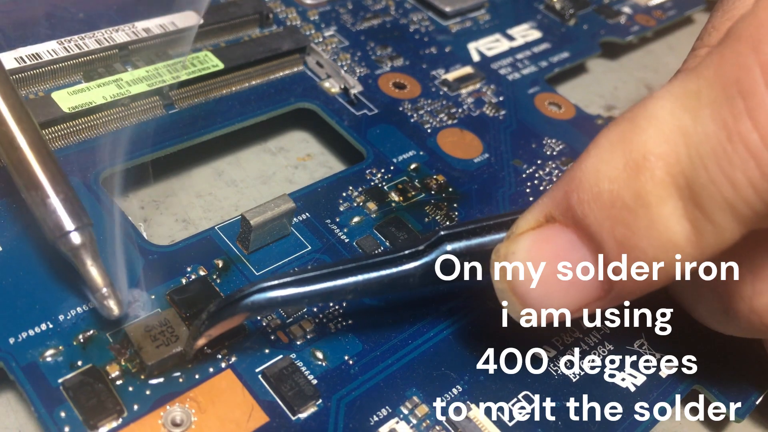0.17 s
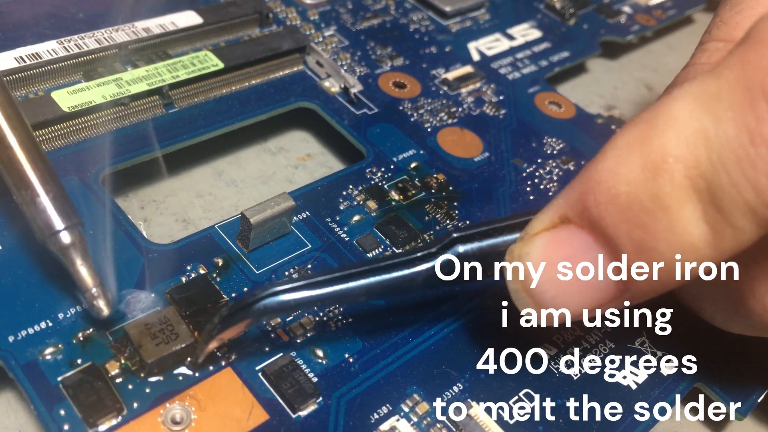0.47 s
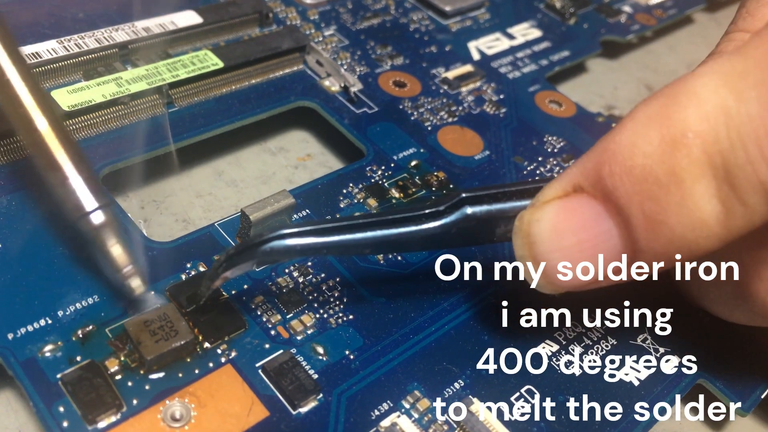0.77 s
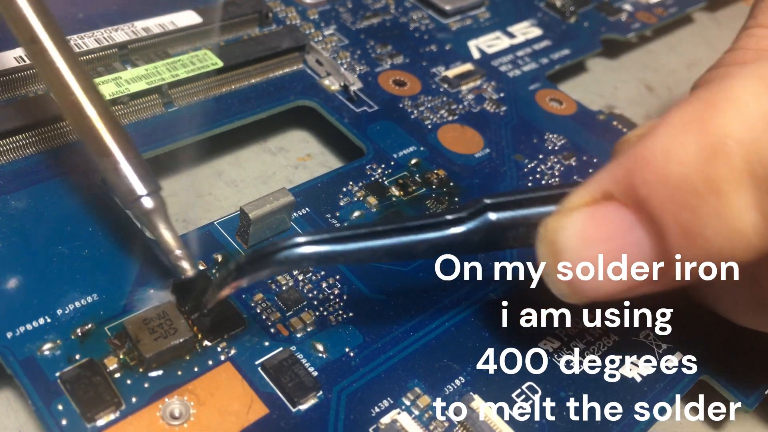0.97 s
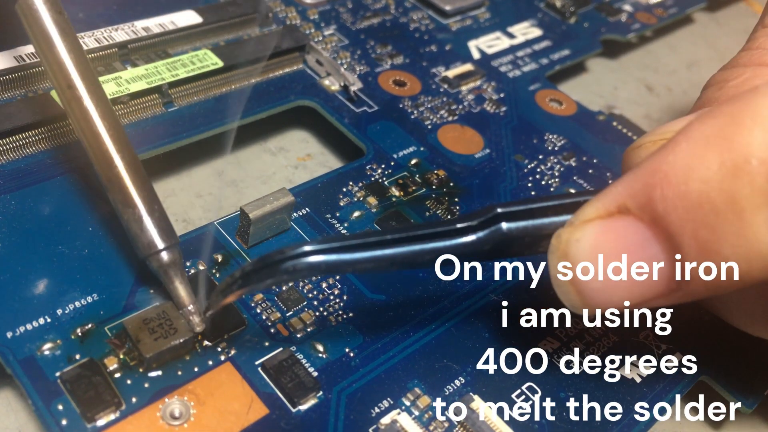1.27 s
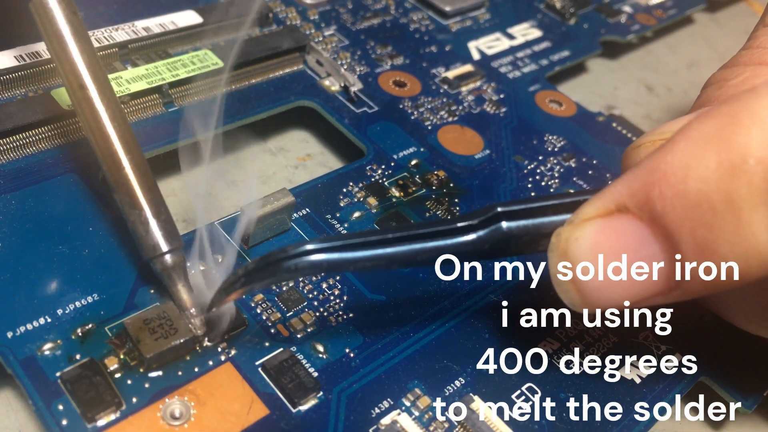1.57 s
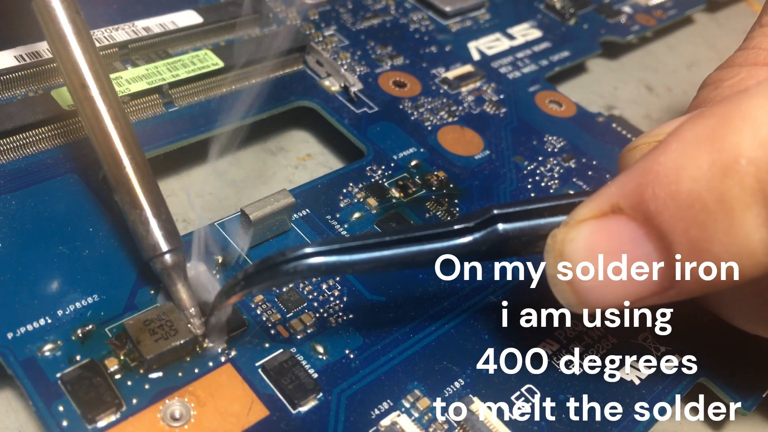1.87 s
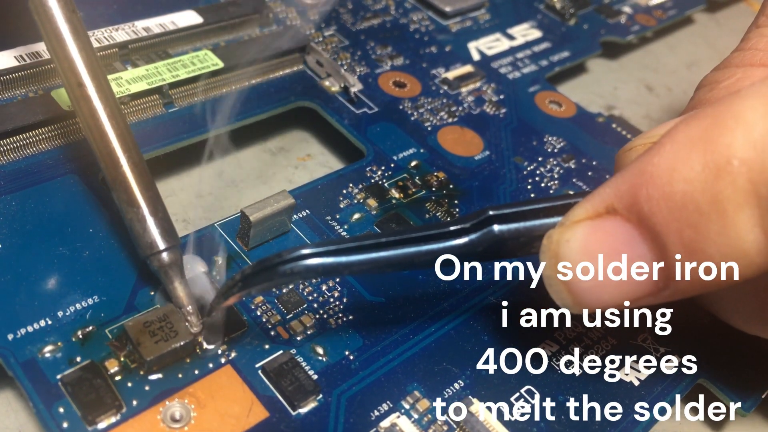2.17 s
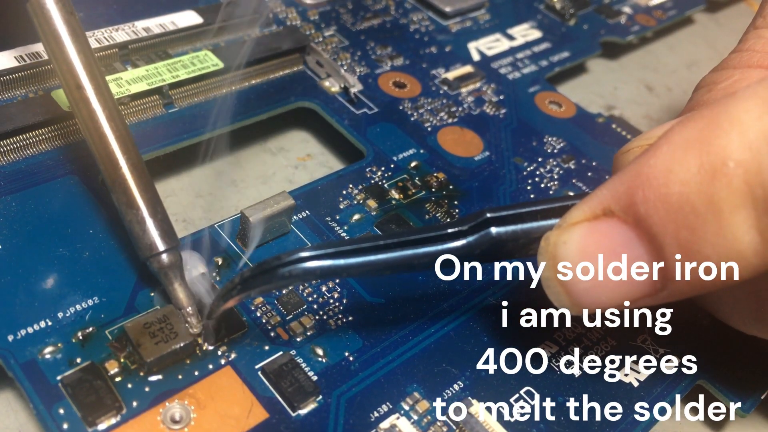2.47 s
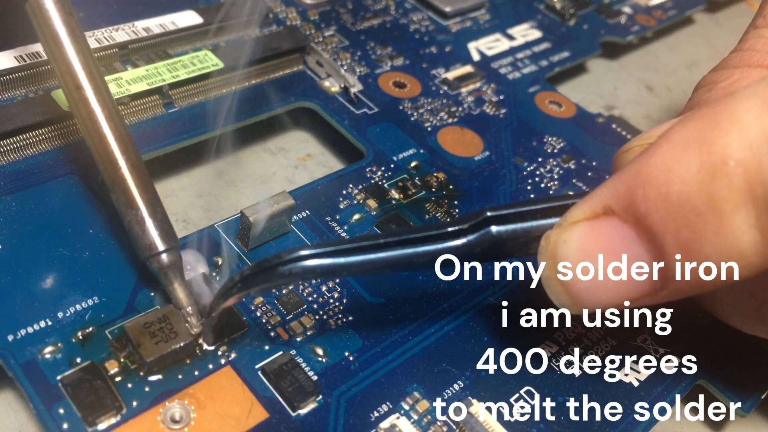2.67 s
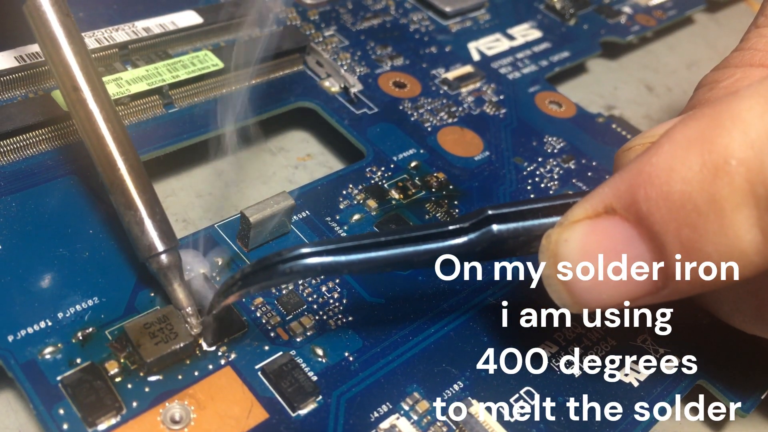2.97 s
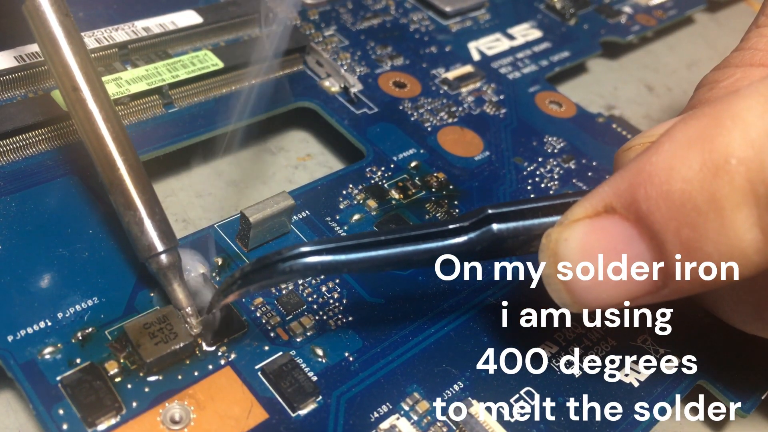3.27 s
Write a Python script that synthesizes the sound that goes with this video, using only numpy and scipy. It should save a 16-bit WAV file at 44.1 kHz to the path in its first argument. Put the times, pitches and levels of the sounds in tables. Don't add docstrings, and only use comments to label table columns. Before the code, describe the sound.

A soldering iron makes flux sizzle on a circuit board: quiet fan rumble and a few small clicks first, then knocks and a sharp hiss fading into fine crackling, close microphone at a workbench.

```python
import sys
import numpy as np
from scipy import signal
from scipy.fft import rfft, irfft, next_fast_len
from scipy.io import wavfile
from scipy.ndimage import uniform_filter1d, map_coordinates

SR = 44100
rng = np.random.default_rng(int(sys.argv[2]) if len(sys.argv) > 2 else 0)


def output_pcm(signal):
    pcm = np.clip(np.atleast_2d(signal).T, -1, 1) * 32767
    wavfile.write(sys.argv[1], SR, np.round(pcm).astype(np.int16))


def level_to_linear(level):
    exponent = np.asarray(level, float) / 20
    return 10 ** exponent


N = 150381
SHAFT_HZ = 63.64
IN_STEP_S = .007
TOP_HZ = 15750


def unit(x):
    return x / np.sqrt(np.mean(x ** 2) + 1e-20)


def along(points, hz):
    f, v = np.transpose(points)
    return level_to_linear(np.interp(np.log(hz + 1), np.log(f + 1), v, left=-120, right=-120))


def along_held(points, hz):
    return along(points, np.minimum(hz, points[-1][0]))


def bumps(rows, hz):
    return sum(db * np.exp(-((hz - centre) / width) ** 2) for centre, width, db in rows)


def wobble(rate):
    knots = rng.standard_normal(int(N * rate / SR) + 4)
    return map_coordinates(knots, [np.arange(N) * rate / SR])


def filtered(x, response):
    m = next_fast_len(N + 8192)
    return irfft(rfft(x, m) * response(np.fft.rfftfreq(m, 1 / SR)), m)[:N]


def patchy(patchy_db):
    z = signal.stft(rng.standard_normal(N), nperseg=256)[2]
    field = uniform_filter1d(rng.standard_normal(z.shape), size=8, axis=0)
    field = uniform_filter1d(field, size=6, axis=1)
    return signal.istft(z * level_to_linear(patchy_db * unit(field)), nperseg=256)[1][:N]


def add(out, s, sound):
    out[round(s * SR):][:len(sound)] += sound


# (multiple of the shaft rate [1], level [dB])
SHAFT_ORDERS = [(1, -51), (2, -49), (3, -59), (4, -60)]
# (frequency [Hz], level [dB])
STEADY_HUMS = [(46.92, -71), (58.28, -55), (102.64, -66), (120.01, -56), (140.76, -63), (205.3, -64),
               (443.55, -65), (2098.6, -82), (4589.1, -89), (5824.6, -94), (6057.6, -92), (9174.5, -90)]


def hum():
    since_step = np.arange(N) / SR - IN_STEP_S
    tones = [(k * SHAFT_HZ, db) for k, db in SHAFT_ORDERS] + list(STEADY_HUMS)
    out = np.zeros(N)
    for hz, db in tones:
        level = np.sqrt(2) * level_to_linear(db + 1 * wobble(3.14))
        out += level * np.sin(2 * np.pi * hz * since_step + .12 * wobble(4.27))
    return out


def bearing():
    turns = np.zeros(N)
    at = np.arange(int(N / SR * SHAFT_HZ)) * SR / SHAFT_HZ + (IN_STEP_S - .002) * SR
    at = at.astype(int)
    turns[at] = level_to_linear(-77 + 2.5 * rng.standard_normal(len(at)))
    t = np.arange(1500) / SR
    ring_hz, t60 = 9930, .014
    tick = level_to_linear(-60 * t / t60) * (1 - np.exp(-t / 0.00039)) * np.sin(2 * np.pi * ring_hz * t)
    return 2 * signal.fftconvolve(turns, tick)[:N]


# (frequency [Hz], density [dB per Hz])
LOW_RUSH = [(25, -41), (50, -10), (90, -11.5), (135, -0.5), (165, -5), (255, 0.5), (350, -4), (480, -21)]
# (frequency [Hz], density [dB per Hz])
HIGH_RUSH = [(240, -48), (400, -5), (684, -5.5), (738, -12.5), (1400, -17.5), (1490, -16), (3020, -27.5),
             (9530, -42.5), (15600, -55)]
# (frequency [Hz], width [Hz], lift [dB])
DUCT_MODES = [(228, 5.8, 4), (284, 29, 2.5), (342, 21, 3), (426, 24, 4), (590, 38, 2), (683.5, 27, 5),
              (929, 72, 5.5), (1184, 119, 5.5), (1400, 19, -1), (2210, 220, 2), (6050, 640, 2.5),
              (7740, 500, -1.5), (9000, 650, 3.5), (10300, 210, -1)]


def air_rush():
    ripple = rng.standard_normal(2000)
    ripple_db, ripple_hz = 1.8, 18

    def colour(hz):
        room_ripple = map_coordinates(ripple, [hz / ripple_hz])
        return level_to_linear(bumps(DUCT_MODES, hz) + ripple_db * (hz > 700) * room_ripple)

    low = unit(filtered(patchy(0.53), lambda hz: along(LOW_RUSH, hz) * colour(hz)))
    high = unit(filtered(patchy(1.21), lambda hz: along_held(HIGH_RUSH, hz) * colour(hz)))
    return level_to_linear(-45) * low + level_to_linear(-51.5 + 0.088 * wobble(2.65)) * high


# (frequency [Hz], density [dB per Hz])
HISS_COLOUR = [(1500, -26), (2500, -12), (4000, -2.5), (6000, -1.5), (9300, 0), (11500, -1), (14200, -5.5),
               (15600, -5)]


def hiss():
    noise = filtered(patchy(1.5), lambda hz: along_held(HISS_COLOUR, hz) * (hz < TOP_HZ))
    return unit(noise) * level_to_linear(.4 * wobble(12) + .9 * wobble(50))


def steam_jet():
    centre_hz, width_hz = 11740, 550
    return unit(filtered(patchy(2.2), lambda hz: np.exp(-((hz - centre_hz) / width_hz) ** 2)))


def small_bubbles():
    per_s, range_db, cap_db = 600, 6, 14
    count = int(np.clip(per_s * N / SR, 1, 6000))
    when, pitch, strength = np.split(rng.random((count, 3)), 3, axis=1)
    hz = np.clip(12800 * np.exp(.21 * 3.6 * (pitch - .5)), 3000, 15500)
    k = np.arange(64)
    cycles = hz * k / SR
    level = level_to_linear(np.minimum(-range_db * np.log(1 - strength), cap_db))
    grains = level * np.exp(-cycles / 1.4) * np.sin(2 * np.pi * cycles)
    at = (when * N).astype(int) + k
    return unit(np.bincount(at.ravel(), grains.ravel(), N + 64)[:N])


# (time [s], level [dB])
BOILING = [(0, -78), (.6, -79.5), (.7, -81), (1.295, -79.5), (1.312, -62), (1.328, -57.5), (1.35, -57),
           (1.39, -55.5), (1.44, -59), (1.55, -60), (1.8, -62), (2.1, -65), (2.6, -66), (3.41, -66.5)]


def boiling():
    simmer_db = -65
    over_db = np.interp(np.arange(N) / SR, *np.transpose(BOILING)) - simmer_db
    bubbles_db = -7 + np.minimum(1.5 * over_db + 3, .6 * over_db)
    mix = level_to_linear(over_db) * hiss()
    mix += level_to_linear(-18 + 2 * over_db) * steam_jet()
    mix += level_to_linear(bubbles_db) * small_bubbles()
    return level_to_linear(simmer_db) * mix


# (frequency [Hz], level [dB], t60 [s])
BOARD_MODES = [(1030, -3, .022), (1250, -3, .022), (1750, -3, .02), (2100, -2, .02), (2400, 0, .022),
               (2800, -2, .02), (3200, -2, .02), (3750, -3, .016), (4200, -4, .016)]
# (time [s], length [s], level [dB])
TIP_SCRAPES = [
    (.335, .012, -65),
    (.733, .03, -64),
    (1.303, .04, -60),
    (1.375, .025, -64),
    (1.49, .03, -63),
]


def scrapes():
    t = np.arange(N) / SR
    stroke = sum(level_to_linear(db) * np.sin(np.pi * np.clip((t - s) / length, 0, 1))
                 for s, length, db in TIP_SCRAPES)

    def board(f):
        return sum(level_to_linear(db) / (1 + ((f - hz) / 200) ** 2) for hz, db, _ in BOARD_MODES)

    return stroke * level_to_linear(2.4 * wobble(400)) * unit(filtered(rng.standard_normal(N), board))


def pop(hz):
    t = np.arange(2048) / SR
    f = np.fft.rfftfreq(2048, 1 / SR)
    bell = np.exp(-(np.log((f + 1) / hz) / .35) ** 2)
    band = unit(irfft(rfft(rng.standard_normal(2048)) * bell))
    envelope = level_to_linear(-60 * t / .0011) * (1 - np.exp(-t / .00005))
    burst = envelope * (np.sin(2 * np.pi * 1.06 * hz * t) + .25 * band)
    spatter = level_to_linear(-19 - 60 * t / .028) * band
    return burst / np.abs(burst).max() + spatter


# (time [s], peak [dB], pitch [Hz])
LARGE_BUBBLES = [(1.3152, -53, 9300), (1.3248, -46, 13200), (1.3348, -48, 11900), (1.3405, -48, 12300),
                 (1.5198, -52, 12600), (1.5601, -49, 10500), (1.57, -50, 11500), (1.5802, -48, 11800),
                 (1.6069, -50, 12600), (1.6438, -51, 12700), (1.6746, -49, 10600), (1.6996, -49, 10600),
                 (1.7262, -51, 10400), (1.7758, -50, 12700), (1.8463, -51, 12200), (1.8498, -50, 11300),
                 (1.879, -47, 12500), (1.9134, -52, 12600), (1.9595, -53, 12200), (2.0055, -53, 12300),
                 (2.0392, -50, 12200), (2.0895, -53, 11000), (2.1223, -47, 12700), (2.1525, -44, 13300),
                 (2.1629, -54, 12500), (2.1936, -49, 11400), (2.2289, -50, 12800), (2.2599, -48, 9700),
                 (2.3292, -52, 10700), (2.3371, -52, 12200), (2.3813, -49, 12500), (2.4129, -55, 11900),
                 (2.4253, -50, 12200), (2.4683, -48, 12200), (2.4968, -54, 12100), (2.5597, -53, 12800),
                 (2.6829, -53, 11900), (2.7021, -49, 12200), (2.725, -56, 12700), (2.7863, -44, 11800),
                 (2.8348, -50, 12500), (2.853, -57, 10300), (2.8703, -56, 11800), (2.9068, -56, 12000),
                 (2.9209, -56, 11000), (2.9827, -50, 13000), (3.0725, -59, 12900), (3.0767, -57, 11300),
                 (3.0979, -56, 11700), (3.1111, -47, 12200), (3.1801, -56, 10200), (3.1925, -56, 10400),
                 (3.1985, -54, 11900), (3.2321, -50, 11100), (3.2488, -49, 11900), (3.2699, -56, 9400),
                 (3.2784, -52, 12700), (3.3, -56, 10900), (3.3364, -55, 11400), (3.3764, -50, 12900)]
# (time [s], peak [dB], pitch [Hz])
SPITS = [
    (.341, -70, 13400),
    (.409, -68, 13000),
    (.606, -60, 14300),
    (1.3145, -51, 6200),
    (1.913, -59, 6200),
    (1.94, -55, 6500),
    (1.962, -55, 6500),
]


def bursts():
    out = np.zeros(N + SR)
    for s, db, hz in list(LARGE_BUBBLES) + list(SPITS):
        add(out, s, level_to_linear(db + 3.5) * pop(hz))
    return out[:N]


# (frequency [Hz], width [Hz], depth [dB])
ECHO_NOTCHES = [(4430, 150, 5.5), (4930, 180, 4), (8100, 790, 2), (10280, 440, 9.5), (11900, 250, 3.5),
                (13500, 380, 2), (14600, 280, 0)]
# (frequency [Hz], width [Hz], depth [dB])
TOP_NOTCHES = [(15110, 150, 11), (15400, 350, 4)]


def board_echoes(x):
    return filtered(x, lambda f: level_to_linear(-bumps(ECHO_NOTCHES, f) - bumps(TOP_NOTCHES, f)))


def ring(modes, stretch, scatter_db):
    t = np.arange(SR // 20) / SR
    x = level_to_linear(-30 - 60 * t / .006) * rng.standard_normal(len(t))
    for hz, db, t60 in modes:
        level = level_to_linear(db + scatter_db * rng.normal() - 60 * t / (t60 * stretch))
        detune = 1 + 0.014 * scatter_db * rng.normal()
        x += level * np.sin(2 * np.pi * hz * detune * t)
    x *= 1 - np.exp(-t / .0002)
    return x / np.abs(x).max()


# (time [s], peak [dB])
TWEEZER_CLICKS = [
    (.3462, -35.5),
    (.3477, -44),
]
# (frequency [Hz], level [dB], t60 [s])
TWEEZER_MODES = [(1203, -4, .02), (1870, -3, .014), (2300, 0, .018), (2590, -2, .013), (2950, -3, .013),
                 (3300, -6, .012), (5250, -4, .012), (5560, -10, .01), (6960, -22, .008), (8400, -24, .008),
                 (9230, -15, .008), (9700, -14, .008), (11210, -19, .009), (14900, -24, .006)]


def tweezers():
    out = np.zeros(N + SR)
    for s, db in TWEEZER_CLICKS:
        add(out, s, level_to_linear(db) * ring(TWEEZER_MODES, 0.93, scatter_db=1.0))
    return out[:N]


# (time [s], peak [dB], ring time factor [1], brightest mode [Hz])
TIP_KNOCKS = [(.409, -54, .5, 3500), (.7438, -48, .35, 2500), (.7446, -54, .5, 3900),
              (1.3135, -49, .9, 2200), (1.3168, -51, .5, 3400), (1.3253, -39, .35, 1900),
              (1.328, -44, 1.4, 1000), (1.3455, -49, .4, 4300), (1.3739, -36, .24, 2500),
              (1.3773, -43, .5, 2200), (1.3885, -50, .4, 3000), (1.4643, -44, .45, 3100),
              (1.4962, -50, .4, 3400), (1.4985, -46, .6, 2100), (1.5105, -50, .5, 2000),
              (2.26, -46.5, .5, 2400), (2.2604, -52, .5, 3800)]


def knocks():
    out = np.zeros(N + SR)
    spread = .5
    for s, db, stretch, spot_hz in TIP_KNOCKS:
        modes = [(hz, level - 8.7 * (np.log(hz / spot_hz) / spread) ** 2, t60)
                 for hz, level, t60 in BOARD_MODES]
        add(out, s, -level_to_linear(db) * ring(modes, stretch, scatter_db=1.5))
    return out[:N]


def room(x):
    t = np.arange(SR // 4) / SR
    tail = rng.standard_normal(len(t)) * level_to_linear(-60 * t / 0.071) * (t > .003)
    return signal.fftconvolve(x, tail / np.linalg.norm(tail))[:N]


def scene():
    fans = hum() + bearing() + air_rush()
    flux = board_echoes(boiling() + bursts())
    hard = scrapes() + tweezers() + knocks()
    return (fans + flux + hard + level_to_linear(-17) * room(hard))[None]


def top_cut(x):
    return signal.sosfilt(signal.butter(12, 15710, fs=SR, output="sos"), x)


def record(dry):
    mix = filtered(dry[0], lambda hz: hz < TOP_HZ)[None]
    return top_cut(mix)


dry = scene()
out = record(dry)
output_pcm(out)
```